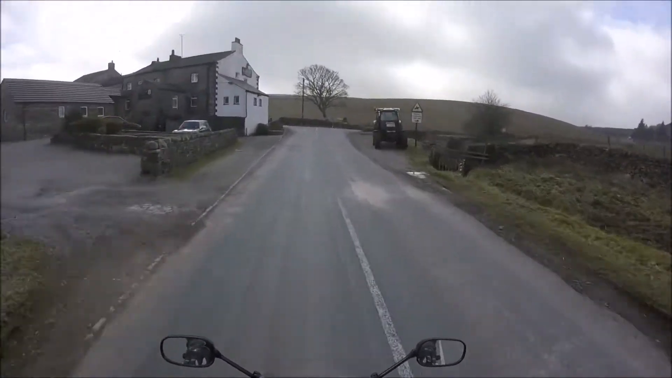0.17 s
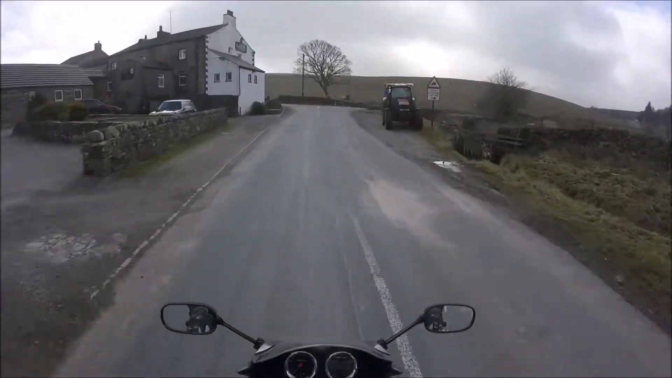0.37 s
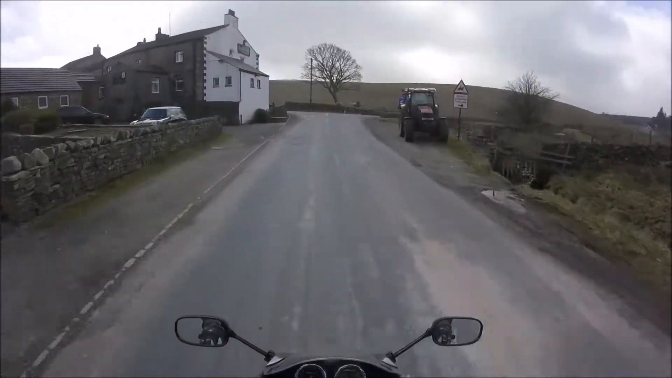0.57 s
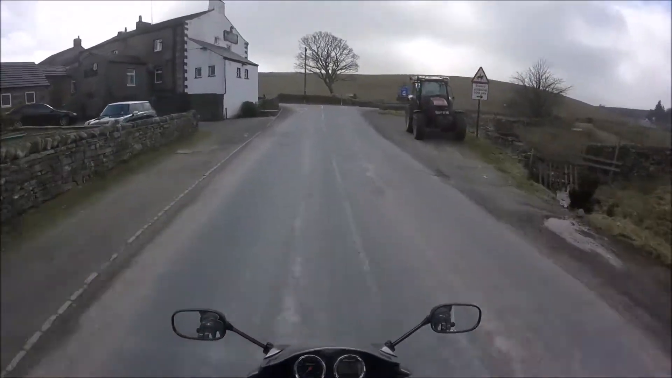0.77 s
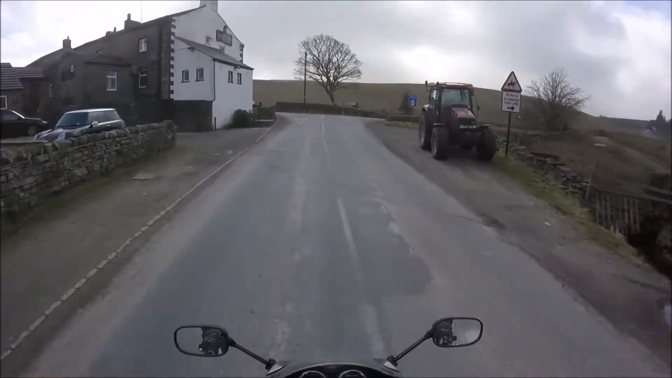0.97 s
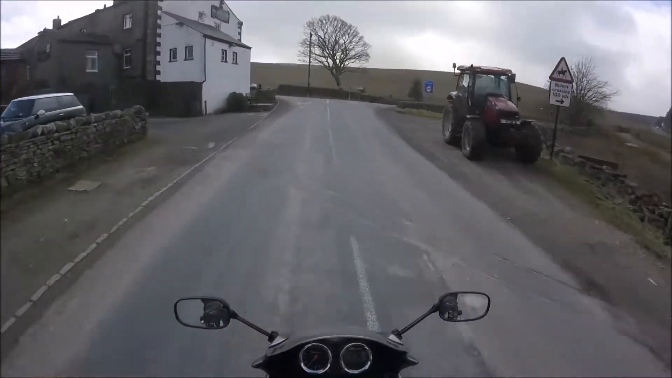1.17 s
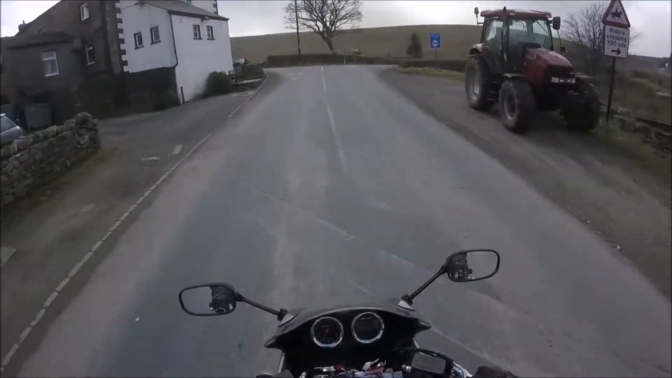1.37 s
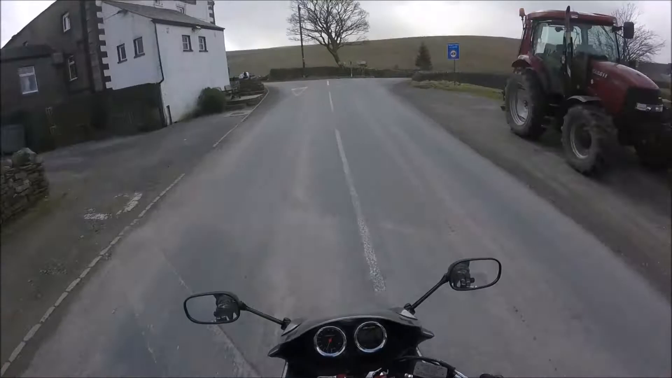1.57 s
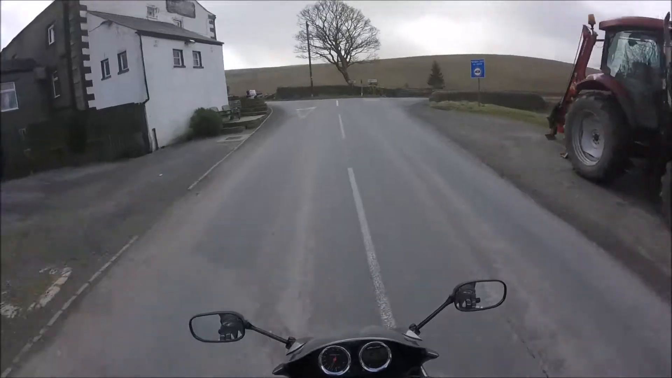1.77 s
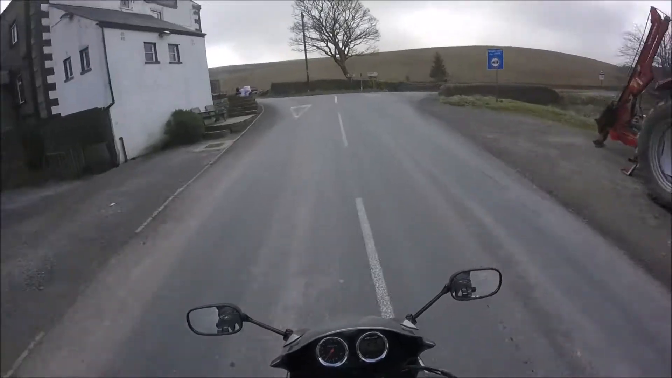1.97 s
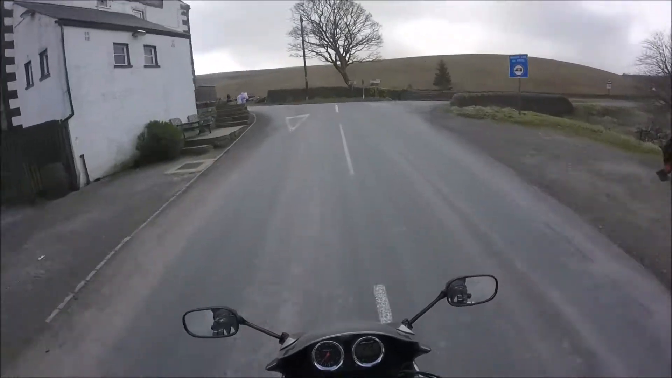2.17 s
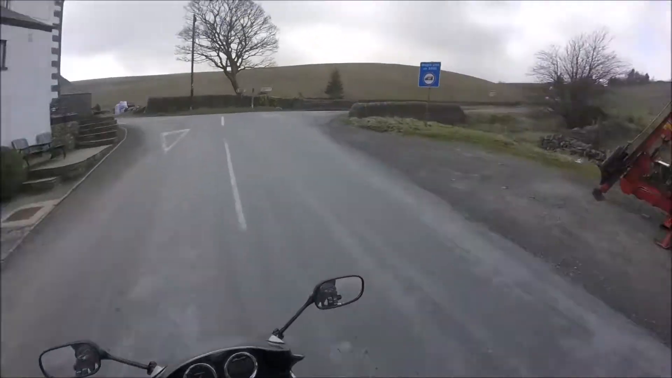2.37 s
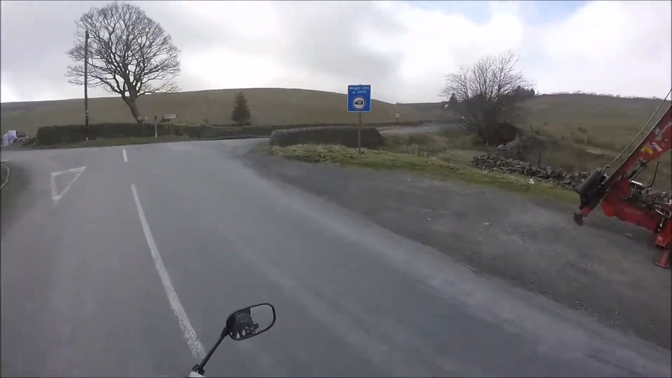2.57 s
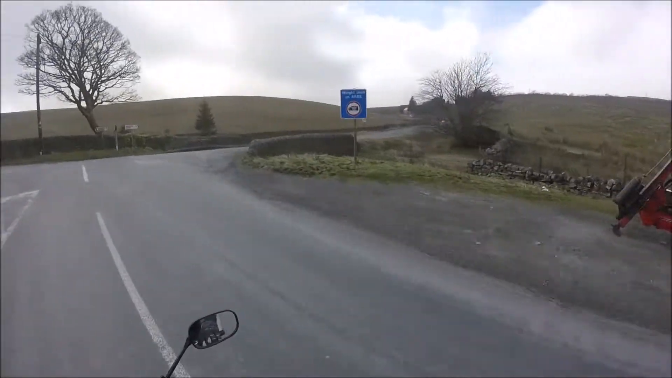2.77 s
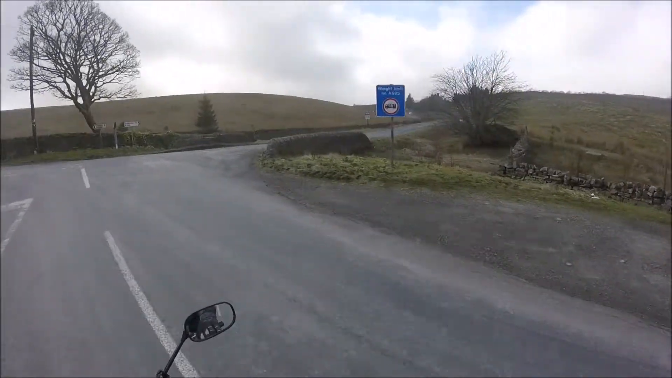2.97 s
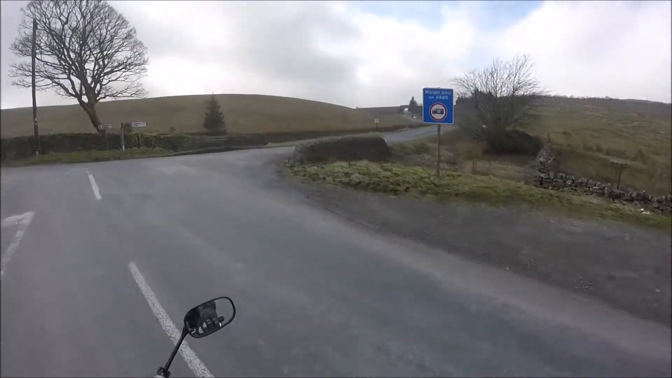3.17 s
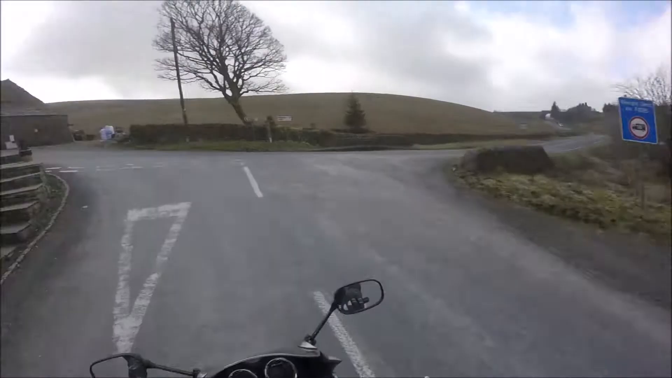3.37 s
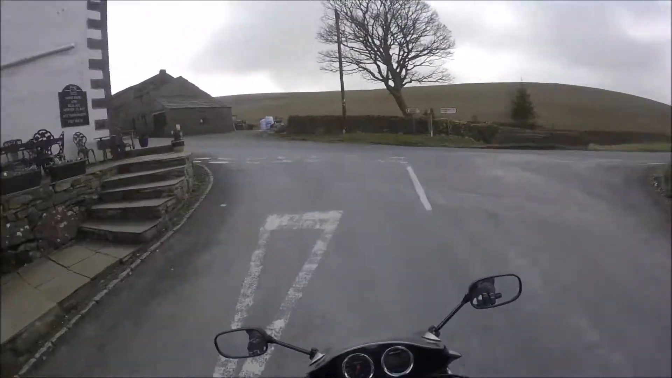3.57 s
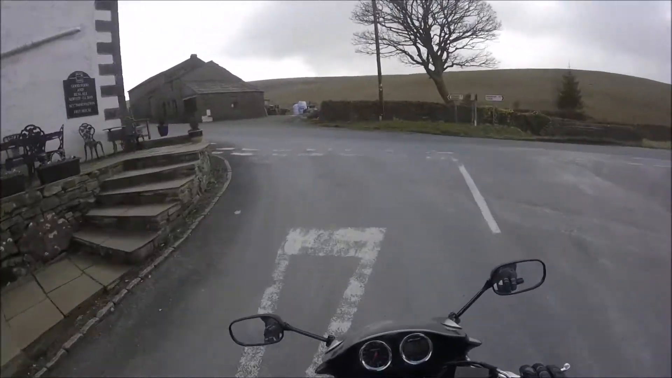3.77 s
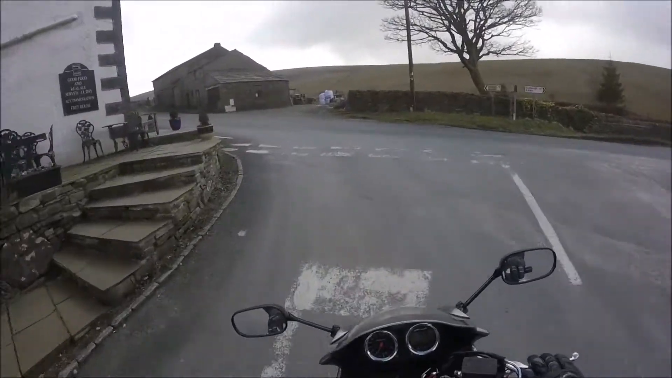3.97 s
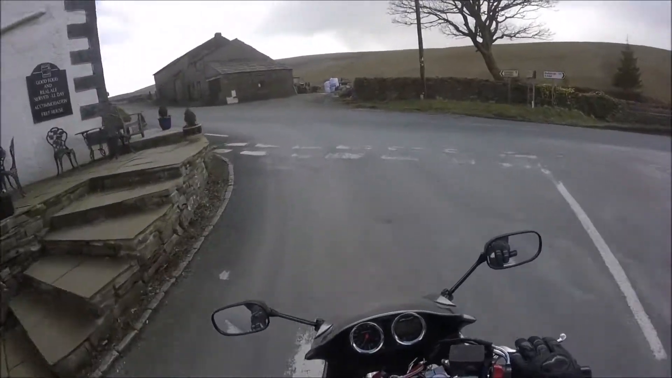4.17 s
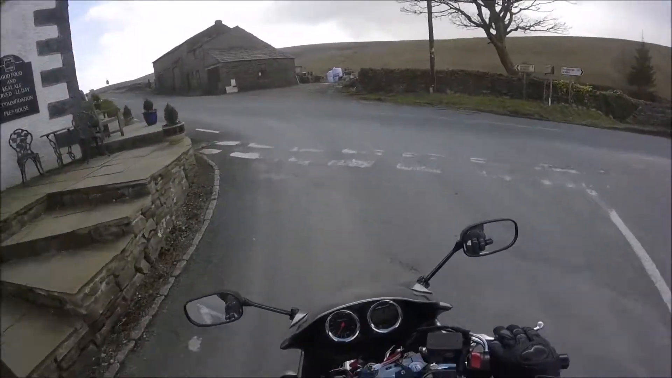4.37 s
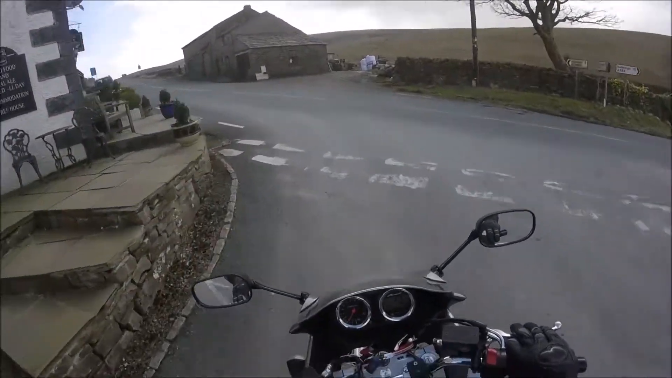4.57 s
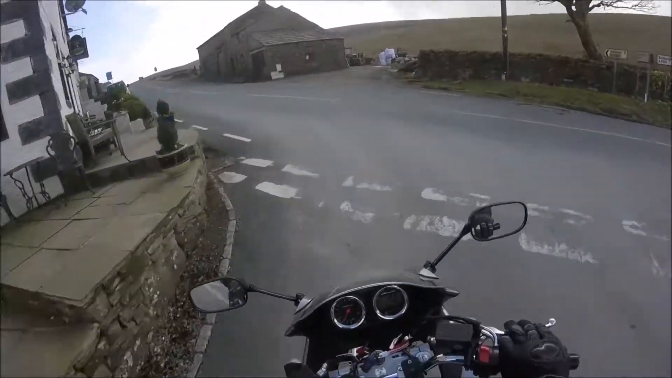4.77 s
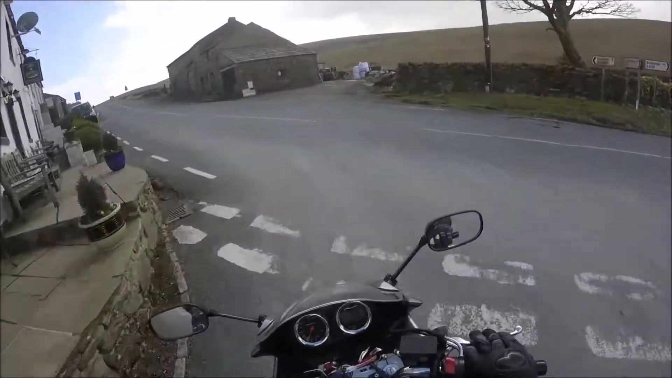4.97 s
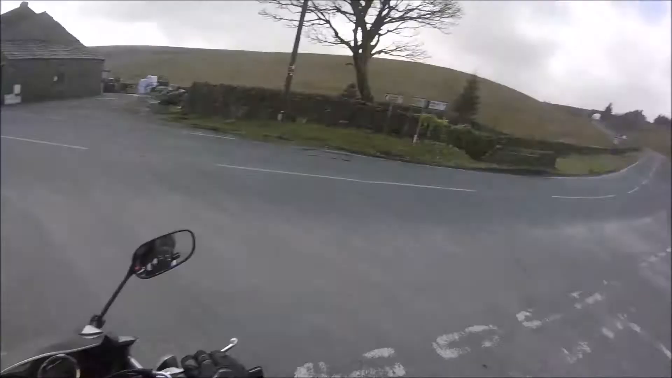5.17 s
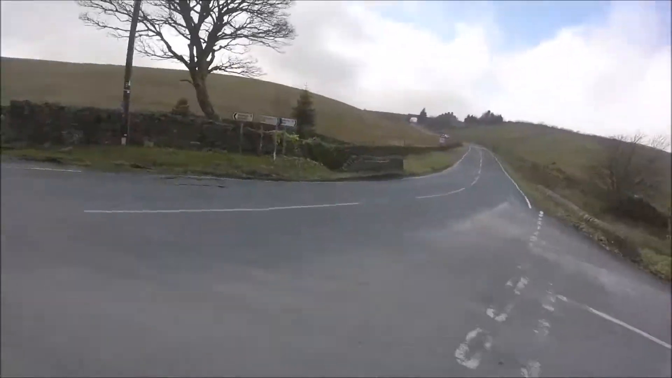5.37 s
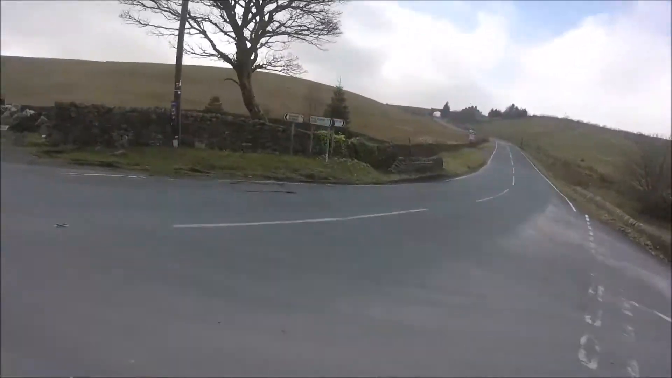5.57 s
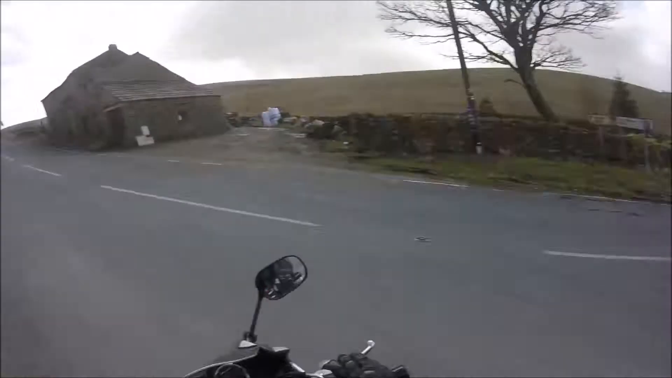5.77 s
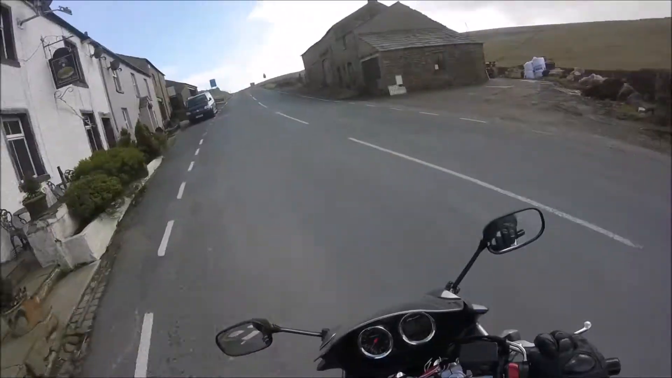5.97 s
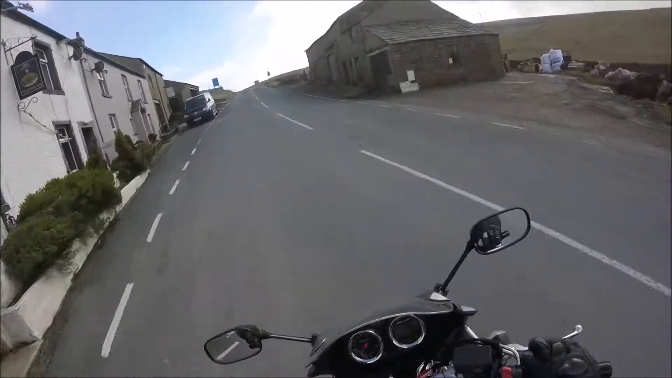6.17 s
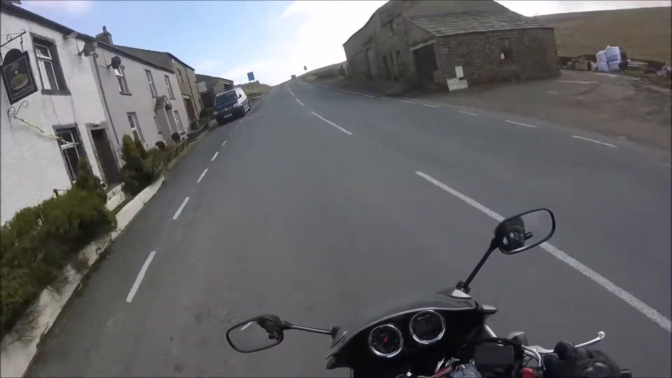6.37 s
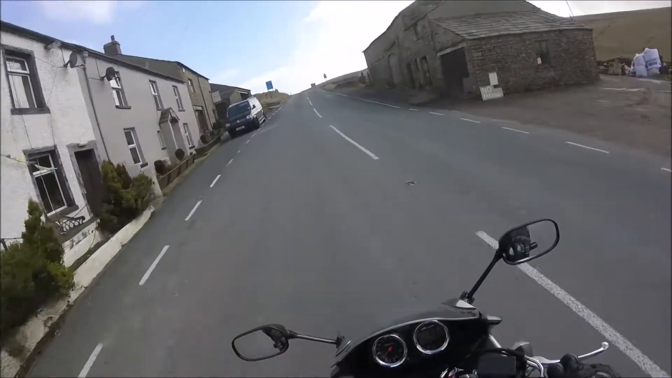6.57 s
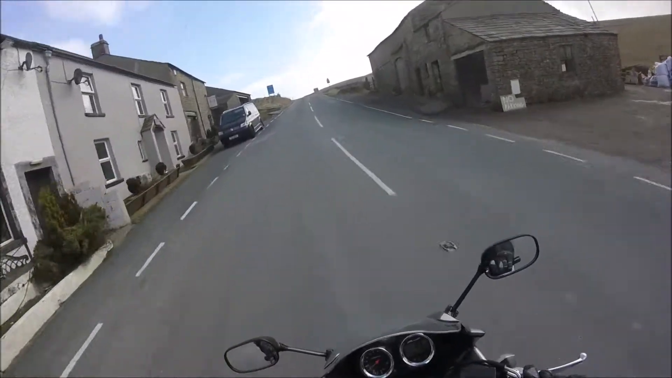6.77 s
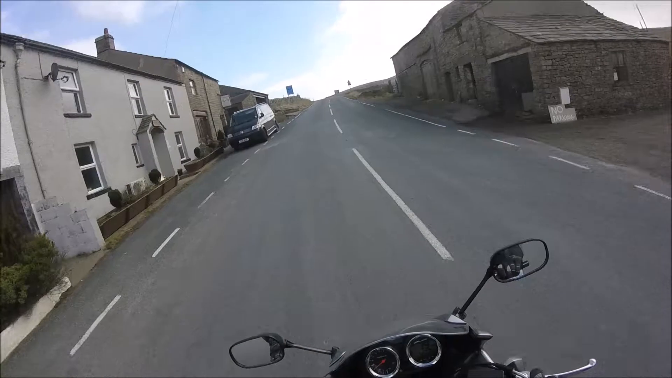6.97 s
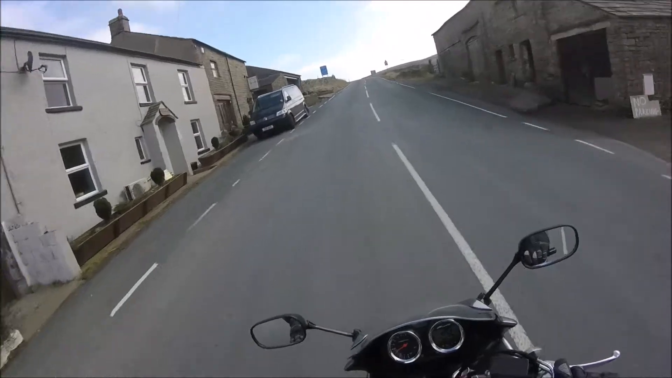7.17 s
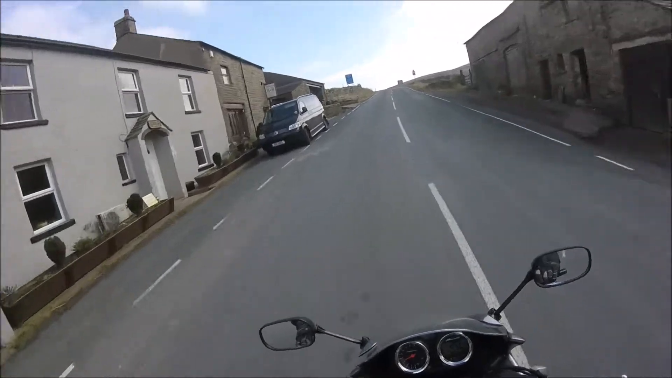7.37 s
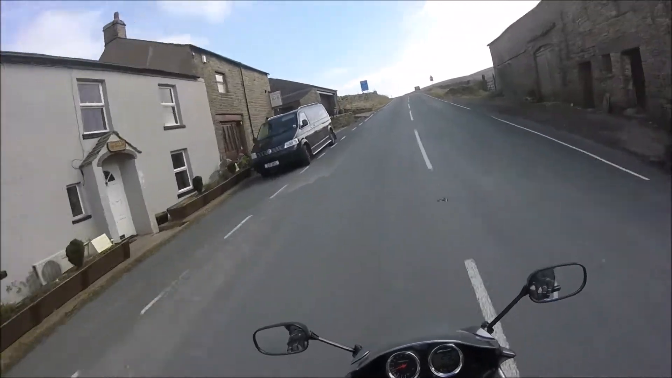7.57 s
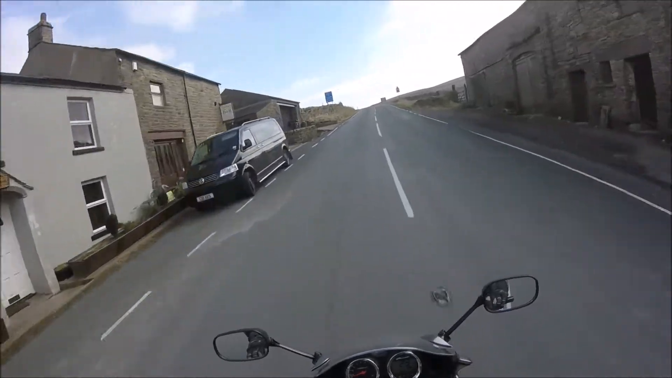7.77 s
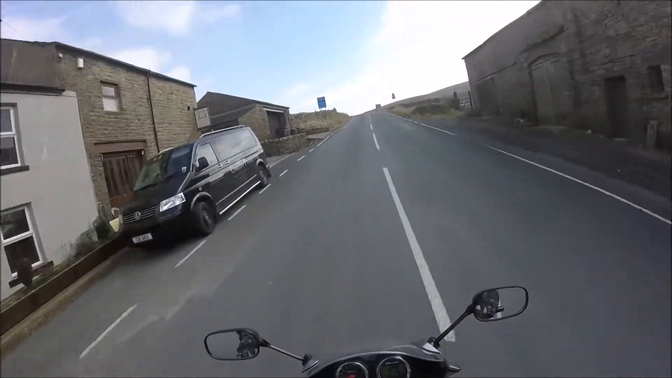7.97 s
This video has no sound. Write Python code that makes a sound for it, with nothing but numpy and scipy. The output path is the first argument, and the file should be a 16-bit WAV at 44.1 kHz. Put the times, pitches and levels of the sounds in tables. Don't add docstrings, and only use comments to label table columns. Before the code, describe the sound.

A motorcycle approaches a junction on an open country road, heard through a boxy, resonant helmet-mounted case. Rushing wind and low thumps dominate first, then subside to near quiet with brief grainy dropouts. The engine takes up, its buzzing exhaust tones and chain whine rising together. A sudden knock jolts the microphone midway; afterwards the whine grows strong and beating, a panel hums, and wind builds again.

```python
import sys
import numpy as np
from scipy import signal
from scipy.fft import rfft, irfft, next_fast_len
from scipy.io import wavfile

SR = 44100
rng = np.random.default_rng(int(sys.argv[2]) if len(sys.argv) > 2 else 0)


def ratio_of_db(decibels):
    return 10 ** (np.asarray(decibels, float) / 20)


def bounce(signal):
    frames = np.transpose(np.atleast_2d(signal))
    limited = np.clip(frames, -1, 1)
    pcm = np.round(limited * 32767).astype(np.int16)
    wavfile.write(sys.argv[1], SR, pcm)


N = 353682
SECONDS = np.arange(N) / SR

# (time [s], chain tooth rate [Hz], load as chain whine level [dB])
ENGINE_RUN = [(3.6, 200, -94), (4.2, 217, -85), (4.4, 226, -74), (4.6, 237.5, -76), (4.8, 243.5, -74),
              (5.0, 258, -67), (5.3, 281.5, -71), (5.6, 304.1, -66), (5.8, 331.3, -67), (6.0, 345.5, -67),
              (6.2, 372.4, -68.5), (6.4, 379.7, -68), (6.6, 403.2, -64), (7.0, 439.2, -60), (7.3, 479, -63),
              (7.6, 515, -62), (7.8, 537, -61), (8.02, 563, -61)]
# (centre [Hz], width [Hz], level over the wall's leak [dB])
CASE_RESONANCES = [(84.6, 24, 12.5), (381, 54.5, 6.5), (951, 55, 1.5), (1415, 152, 17), (1601, 136, 17),
                   (2347, 557, 17), (2606, 220, 13), (2983, 190, 11), (3400, 250, 16.5), (3804, 510, 9),
                   (5700, 270, -3.5), (6000, 410, 12), (6296, 310, 10), (7430, 670, 2), (8080, 550, 6),
                   (8970, 440, 5)]
# (frequency [Hz], level [dB])
WHINE_PATH = [(300, -14), (450, -0.5), (540, 4), (620, 5), (740, 5), (830, -3.5), (970, -11.5), (1080, 0.5),
              (1180, -3), (1450, 2), (1650, 2), (1780, -26), (2100, -11), (3200, -5)]
PULL_HZ = 400
TEETH_PER_FIRING = 17 / 4
CRUISE_DB = -46


def rms_one(x):
    return x / np.sqrt(np.mean(x ** 2) + 1e-20)


def in_time(rows):
    s, *columns = np.transpose(rows)
    return [np.interp(SECONDS, s, column) for column in columns]


def at_hz(points, hz):
    table_hz, table_db = np.array(points)[:, 0], np.array(points)[:, 1]
    return np.interp(np.log(hz), np.log(table_hz), table_db)


def bumps(rows):
    return sum(np.outer(height, np.exp(-((SECONDS - s) / half) ** 2)) for s, half, *height in rows)


def drift(rate):
    coarse = 40
    r = np.exp(-2 * coarse * np.pi * rate / SR)
    noise = rng.standard_normal(N // coarse + 2002)
    slow = signal.lfilter([1], [1, -2 * r, r * r], noise)[2000:]
    return np.interp(np.arange(N) / coarse, np.arange(len(slow)), rms_one(slow))


def phase(hz):
    return 2 * np.pi * np.cumsum(hz) / SR


def case_gain(hz, resonances=CASE_RESONANCES):
    power = 1
    for centre, width, db in resonances:
        power = power + ratio_of_db(db) ** 2 / (1 + (2 * (hz - centre) / width) ** 4)
    return np.sqrt(power)


def cased_noise(spectrum, patchy_db, gusty_db, resonances=CASE_RESONANCES):
    size = next_fast_len(N)
    hz = np.maximum(np.arange(size // 2 + 1) * SR / size, 1)
    bins = rfft(rng.standard_normal(size)) * ratio_of_db(at_hz(spectrum, hz)) * case_gain(hz, resonances)
    low_hz, high_hz = spectrum[0][0], spectrum[-1][0]
    half_octaves = 2 * np.log2(hz / low_hz)
    out = 0
    for k in range(int(2 * np.log2(high_hz / low_hz)) + 2):
        band = irfft(bins * np.clip(1 - abs(half_octaves - k), 0, 1), size)[:N]
        out = out + band * ratio_of_db(patchy_db * drift(11.0))
    return rms_one(out * ratio_of_db(gusty_db * drift(19.4)))


def ring(force, modes):
    out = 0
    for hz, db, t60 in modes:
        r, w = ratio_of_db(-60 / (t60 * SR)), 2 * np.pi * hz / SR
        out = out + signal.lfilter([0, ratio_of_db(db) * np.sin(w)], [1, -2 * r * np.cos(w), r * r], force + 1e-18)
    return out


def orders(hz, multiples, path, extra_db, wobble_db, slip):
    turns = np.cumsum(hz) / SR
    out = 0
    for k, db in multiples:
        waver_db = wobble_db * (drift(5.0) + 1.1 * drift(30.0))
        level_db = db + extra_db.get(k, 0) + at_hz(path, k * hz) + waver_db
        level = ratio_of_db(level_db) * case_gain(k * hz)
        out = out + level * np.sin(2 * np.pi * k * turns + slip * drift(20.0))
    return out


def chain_whine(tooth_hz, whine_db):
    # (multiple of tooth rate, level [dB])
    harmonics = [(1, -3), (2, -4), (3, 0), (4, -3), (5, -7), (6, -14), (7, -19), (8, -20)]
    # (time [s], half length [s], level [dB])
    second_swells = [
        (7.95, 0.11, 6.6),
        (5.0, 0.13, 2.6),
    ]
    # (time [s], half length [s], level [dB])
    third_swells = [
        (4.4, 0.56, -7.5),
        (5.8, .1, 3),
        (6.3, .2, 10),
        (6.96, 0.057, 9),
        (7.17, 0.067, 4.5),
        (7.31, 0.083, 10.5),
        (7.45, 0.061, 5),
        (7.9, 0.23, -9),
    ]
    # (time [s], half length [s], level [dB])
    fourth_swells = [
        (5.9, 0.089, 3.5),
        (6.2, 0.13, 2.5),
        (6.55, 0.21, -3),
    ]
    extra_db = {2: bumps(second_swells)[0], 3: -1.5 + bumps(third_swells)[0], 4: bumps(fourth_swells)[0]}
    chain = orders(tooth_hz, harmonics, WHINE_PATH, extra_db, wobble_db=1.3, slip=.5)
    teeth_per_beat, peak_s, depth = 39, 7.245, .4
    beats = np.cumsum(tooth_hz) / SR / teeth_per_beat
    beating = 1 + depth * np.cos(2 * np.pi * (beats - beats[round(peak_s * SR)]))
    return ratio_of_db(whine_db - 6.5) * beating * chain


def firing_tones(tooth_hz, whine_db):
    # (multiple of firing rate, level [dB])
    multiples = [(1, -3.5), (2, -6), (3, -12), (4, -12), (5, -15)]
    # (frequency [Hz], level [dB])
    pipe = [(55, 2.5), (80, -8), (101, 4.5), (143, 5.5), (160, -5.5), (213, 0), (260, -2)]
    # (frequency [Hz], level [dB])
    exhaust = [(300, -8), (420, 1), (520, -4), (700, 2)]
    # (time [s], half length [s], level [dB])
    boom = [
        (6.88, 0.16, 7),
    ]
    pull_db = -65
    firing_db = -65.5 + 0.38 * (whine_db - pull_db)
    tones = orders(tooth_hz / TEETH_PER_FIRING, multiples, pipe + exhaust, {4: bumps(boom)[0]},
                   wobble_db=1.5, slip=0.23)
    return ratio_of_db(firing_db) * tones


def valve_clatter(tooth_hz):
    # (frequency [Hz], level per Hz [dB])
    frame_spectrum = [(500, -2), (900, -13), (1450, -2), (1900, -14.5), (2200, -15), (2800, -23.5),
                      (3500, -31), (4500, -19), (5400, -29), (6000, -42.5), (12000, -62)]
    # (centre [Hz], width [Hz], level [dB])
    cover_mode = (5030, 260, 9)
    # (time [s], half length [s], level [dB])
    throttle_blips = [
        (1.63, 0.22, 9),
        (4.74, 0.6, 3),
        (6.25, .15, 2),
    ]
    throb = 1 + 0.057 * np.sin(phase(tooth_hz / TEETH_PER_FIRING))
    db_per_octave = 10
    clatter_db = -57 + db_per_octave * np.log2(tooth_hz / PULL_HZ) + bumps(throttle_blips)[0]
    noise = cased_noise(frame_spectrum, 1.2, 1.0, CASE_RESONANCES + [cover_mode])
    return ratio_of_db(clatter_db) * throb * noise


def gear_mesh(tooth_hz):
    mesh_per_tooth = 6.4
    level = bumps([(4.6, .33, ratio_of_db(-80))])[0]
    return level * orders(mesh_per_tooth * tooth_hz, [(1, 0)], WHINE_PATH, {}, wobble_db=1.3, slip=.5)


def fairing_hum():
    # (time [s], pitch [Hz], level [dB])
    hum_curve = [(6.95, 177.3, -98), (7.1, 177, -76), (7.4, 177.1, -69.5), (7.75, 175.7, -67),
                 (7.9, 173.3, -88)]
    hum_hz, hum_db = in_time(hum_curve)
    started = SECONDS > hum_curve[0][0]
    return started * ratio_of_db(hum_db + 2.2 * drift(8.7)) * np.sin(phase(hum_hz))


def engine():
    tooth_hz, whine_db = in_time(ENGINE_RUN)
    tones = chain_whine(tooth_hz, whine_db) + firing_tones(tooth_hz, whine_db)
    return tones + valve_clatter(tooth_hz) + gear_mesh(tooth_hz) + fairing_hum()


def knocks():
    # (time [s], push [dB], direction [+1/-1], contact time [s], ring relative to push [dB])
    blows = [
        (5.6673, -27.5, 1, 0.0028, -30),
        (5.672, -37, -1, 0.0039, -23),
        (5.6793, -44, -1, .0062, 28),
        (5.6838, -40, -1, .0012, -20),
        (5.212, -47.5, -1, 0.015, 3),
        (5.277, -55, -1, 0.004, 5),
        (5.286, -47, 1, 0.0038, -9),
        (5.298, -51, 1, .004, -7),
    ]
    # (time [s], level [dB])
    shell_cracks = [
        (5.6672, -56),
        (5.6838, -37),
    ]
    # (frequency [Hz], level [dB], decay t60 [s])
    mount_modes = [(102.8, -0.5, 0.27), (100, -6.5, 0.056), (166, -20, 0.051), (256, -21, 0.15)]
    # (frequency [Hz], level [dB], decay t60 [s])
    shell_modes = [(1540, -35, .015), (2400, 3, 0.026), (2100, -12, 0.053), (3900, -18, 0.02),
                   (7000, -16, .006)]
    push, swing, crack = np.zeros((3, N))
    for s, push_db, way, contact, ring_db in blows:
        at = round(s * SR)
        shape = np.hanning(max(round(contact * SR), 3)) * np.sign(way) * ratio_of_db(push_db)
        push[at:at + len(shape)] += shape
        swing[at:at + len(shape)] += shape * 2 / len(shape) * ratio_of_db(ring_db)
    for s, crack_db in shell_cracks:
        crack[round(s * SR):][:4] += ratio_of_db(crack_db) * np.hanning(6)[1:-1] / 2.6
    vent = signal.butter(1, 40, "high", fs=SR, output="sos")
    return signal.sosfilt(vent, push + ring(swing, mount_modes)) + ring(crack, shell_modes)


def airflow():
    # (time [s], airflow as hiss level [dB], turbulence as buffet level [dB])
    air = [(0.0, -46.5, -49), (0.45, -46.5, -52), (0.8, -46, -49), (1.0, -48, -53), (1.27, -49, -54),
           (1.4, -56, -53), (1.52, -57, -52.5), (1.8, -56, -56), (2.1, -59.5, -55.5), (2.8, -59.5, -59.5),
           (3.42, -62.5, -61), (3.8, -63.5, -62), (4.13, -73, -62), (5.0, -69.5, -63), (5.9, -68, -64),
           (6.9, -69.5, -70), (7.57, -65, -65), (7.95, -62, -57)]
    # (time [s], half length [s], airflow [dB], turbulence [dB])
    gusts = [(.09, 0.032, 4.5, -2), (.15, 0.034, 3, 5), (.27, 0.11, 0.5, 8), (.345, 0.048, 6.5, -4),
             (.56, 0.035, -0.5, 2), (.72, 0.076, 1, 1), (1.14, 0.038, -0.5, 6.5), (1.21, .04, 3, 1),
             (1.47, 0.059, 1.5, -9), (1.53, 0.027, -4.5, -1), (1.7, .1, 3, 3.5), (1.98, 0.022, 1.5, 1),
             (2.3, 0.047, 5, -4.5), (2.47, 0.084, 6, 3.5), (2.62, 0.038, 6, 2.5), (2.8, 0.052, 0.5, 2),
             (2.95, 0.1, -3.5, 2.5), (3.4, 0.093, 2.5, -1), (3.5, .04, -2.5, 4.5), (5.27, 0.11, 4.5, 4.5),
             (7.12, .1, 5, 0), (6.35, .2, 2, 1), (7.9, .1, 2.5, 3), (.97, 0.037, -1.5, 3),
             (.21, 0.022, 1, 5)]
    air_db, turbulence_db = in_time(air)
    gust_db, lump_db = bumps(gusts)
    return air_db - CRUISE_DB, gust_db, turbulence_db + lump_db


def buffeting(flow_db, gust_db, buffet_db):
    # (frequency [Hz], level per Hz [dB])
    buffet_spectrum = [(15, 9.5), (40, -1), (70, -5), (120, -7.5), (180, -35)]
    # (frequency [Hz], level per Hz [dB])
    rumble_spectrum = [(90, -23), (150, -1.5), (300, -3.5), (500, -10), (900, -18.5), (1300, -22.5)]
    jolt_db = bumps([(5.688, 0.021, 19)])[0]
    rumble_db = -55 + 0.66 * flow_db + 0.31 * gust_db + jolt_db
    buffet = ratio_of_db(buffet_db) * cased_noise(buffet_spectrum, 0.98, 1.54)
    return buffet + ratio_of_db(rumble_db) * cased_noise(rumble_spectrum, 0.63, 0.61)


def wind_hiss(flow_db, gust_db):
    # (frequency [Hz], level per Hz [dB])
    hiss_spectrum = [(700, -7), (1200, -5.5), (2000, -2.5), (3500, -5.5), (4100, -7.5), (4350, -14),
                     (5200, -25.5)]
    # (frequency [Hz], level per Hz [dB])
    top_spectrum = [(3800, -12.5), (4600, -4), (7000, -7.5), (9500, -11), (11000, -17.5), (13500, -28.5),
                    (15200, -29), (15600, -62)]
    hiss = cased_noise(hiss_spectrum, 1.0, 0.21)
    split = signal.butter(3, 3850, "high", fs=SR, output="sos")
    upper = signal.sosfiltfilt(split, hiss)
    shelter_s, fade_s, open_air_db = 1.3, 0.045, 5.5
    side_wind_db = open_air_db / (1 + np.exp((SECONDS - shelter_s) / fade_s))
    dullest_db = -3
    bright = ratio_of_db(np.maximum(3.5 + 0.27 * flow_db, dullest_db) + side_wind_db)
    body = ratio_of_db(flow_db + CRUISE_DB + gust_db) * (hiss + (bright - 1) * upper)
    tooth_hz = in_time(ENGINE_RUN)[0]
    tappet_db = -77.5 + 7 * np.log2(tooth_hz / PULL_HZ)
    top_db = -56 + 1.63 * flow_db + 1.08 * gust_db
    top = np.hypot(ratio_of_db(top_db), ratio_of_db(tappet_db)) * cased_noise(top_spectrum, 0.26, 0.63)
    eddies = ratio_of_db(0.77 * drift(32.0))
    return eddies * (body + top)


def whistle():
    # (centre [s], half length [s], start [Hz], end [Hz], level [dB])
    chirps = [
        (0.243, .008, 5550, 5900, -56),
        (.316, 0.032, 5550, 6500, -50),
        (0.381, 0.0238, 6400, 5500, -52),
        (1.215, .025, 3900, 4100, -57),
    ]
    waver, flutter = 1 + .008 * drift(90.0), ratio_of_db(5.5 * drift(60.0))
    out = 0
    for s, half, start_hz, end_hz, db in chirps:
        hz = np.interp(SECONDS, [s - half, s + half], [start_hz, end_hz]) * waver
        swell = np.exp(-((SECONDS - s) / half) ** 4)
        out = out + ratio_of_db(db) * swell * np.sin(phase(hz))
    return out * flutter


def wind():
    flow_db, gust_db, buffet_db = airflow()
    return buffeting(flow_db, gust_db, buffet_db) + wind_hiss(flow_db, gust_db) + whistle()


def scene():
    return (engine() + knocks() + wind())[None]


def dropouts(x):
    # (centre [s], length [s], depth [dB])
    gaps = [(.057, .014, -14), (.675, .016, -14), (.95, .018, -20), (1.409, .034, -35), (1.472, .032, -35),
            (2.533, .014, -13), (2.637, .014, -13), (3.19, .014, -13), (3.255, .015, -14),
            (3.361, .014, -13), (3.576, .014, -14), (3.679, .014, -13), (5.06, .034, -20),
            (5.153, .016, -15), (5.303, .014, -14), (5.367, .016, -15), (5.623, .015, -13)]
    # (from [Hz], to [Hz])
    weak_ranges = [(500, 950), (4200, 5650), (6550, 20000)]
    # (time [s], pitch [Hz], level [dB])
    lone_tones = [
        (1.47, 8050, -80),
        (2.533, 8750, -82),
        (2.637, 8900, -82),
        (3.19, 8900, -86),
        (3.19, 5520, -82),
        (3.679, 5000, -86),
        (5.06, 5000, -82),
        (5.06, 9000, -88),
    ]
    edge_s, tone_half_s = .006, .018
    bin_hz = np.arange(N // 2 + 1) * SR / N
    weak_bands = sum((bin_hz > low_hz) & (bin_hz < high_hz) for low_hz, high_hz in weak_ranges)
    weak = irfft(rfft(x) * weak_bands, N)
    lost, kept = 0, 0
    for s, length, db in gaps:
        lost = lost + (1 - ratio_of_db(db)) * np.clip((length / 2 - abs(SECONDS - s)) / edge_s + .5, 0, 1)
    for s, hz, db in lone_tones:
        kept = kept + bumps([(s, tone_half_s, ratio_of_db(db))])[0] * np.sin(2 * np.pi * hz * SECONDS)
    return x - lost * weak + kept


def top_cut(x):
    return signal.sosfilt(signal.butter(12, 15590, fs=SR, output="sos"), x)


def record(dry):
    self_noise = signal.lfilter([.5, .22], [1], rng.standard_normal(dry.shape))
    x = dry + ratio_of_db(-85) * self_noise
    x = signal.sosfilt(signal.butter(1, 18, "high", fs=SR, output="sos"), x)
    return top_cut(dropouts(x))


dry = scene()
out = record(dry)
bounce(out)
```